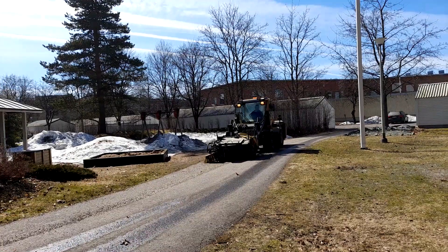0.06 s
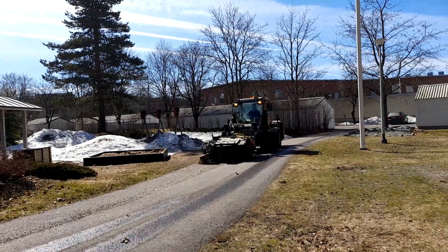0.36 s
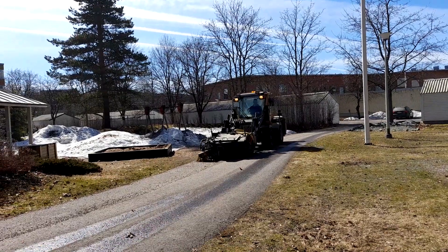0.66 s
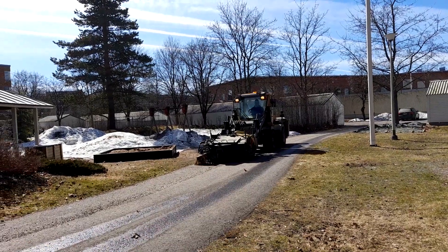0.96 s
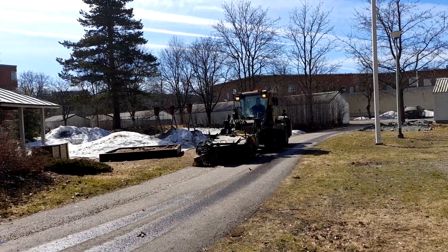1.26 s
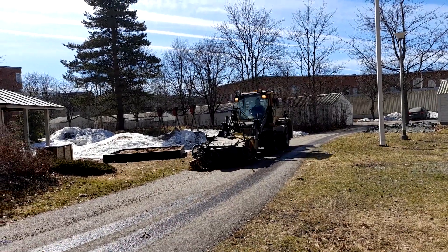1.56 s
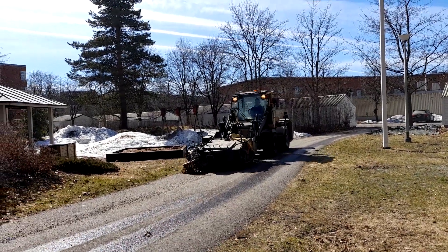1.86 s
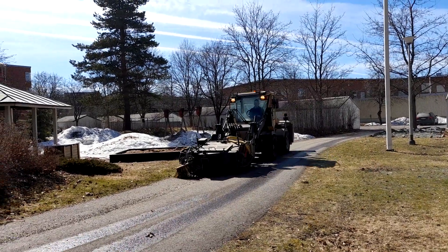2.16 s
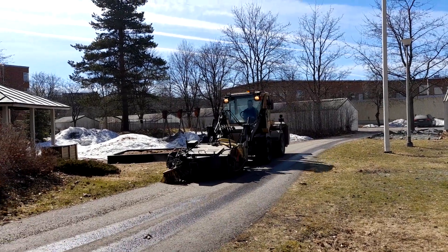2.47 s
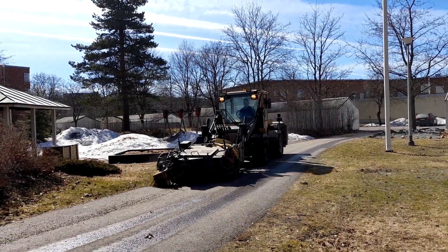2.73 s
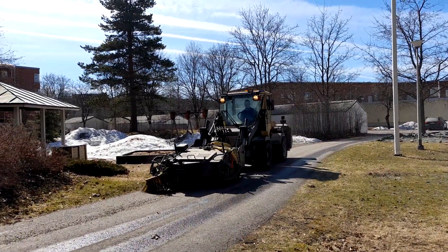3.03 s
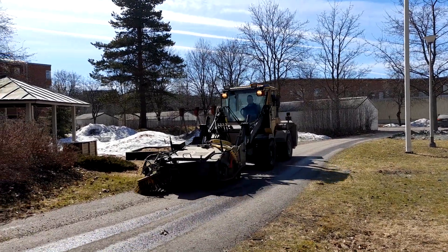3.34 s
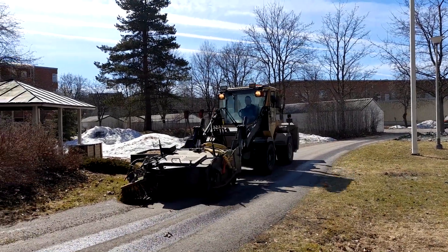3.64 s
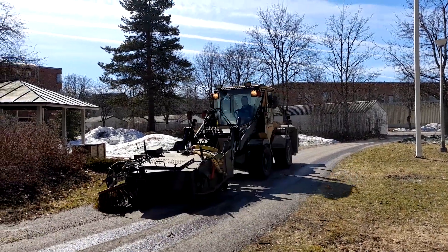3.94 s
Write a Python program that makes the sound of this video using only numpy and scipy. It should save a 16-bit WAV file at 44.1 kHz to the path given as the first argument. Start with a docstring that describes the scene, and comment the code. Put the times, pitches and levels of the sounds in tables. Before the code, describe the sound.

A sweeper's spinning brush flings rattling, hissing grit as its rumbling diesel loader approaches.

```python
"""A rotary broom sweeps a gritty path as the wheel loader carrying it creeps closer, in the open air.
The bristles fling grit in clumps that rattle on the hood and scratch over the path, and they hiss
more brightly as the machine nears. Bigger stones crack against the hood, which rumbles with countless
knocks, while the diesel drones at a steady speed. Early on, a gust of wind buffets the left microphone."""
import sys
import numpy as np
from scipy import signal
from scipy.fft import rfft, irfft, next_fast_len
from scipy.io import wavfile
from scipy.ndimage import map_coordinates

SR = 44100
rng = np.random.default_rng(int(sys.argv[2]) if len(sys.argv) > 2 else 0)


def persist_wave(psi):
    """Save psi, clipped to +-1, as 16-bit WAV."""
    counts = np.round(np.clip(psi, -1, 1) * 32767).astype(np.int16)
    wavfile.write(sys.argv[1], SR, np.atleast_2d(counts).T)


N = 176400   # 4 seconds


def broom():
    """Tufts of bristles fling grit in clumps; each clump rattles, scratches and hisses at once."""
    clumps = 1.96 * np.tanh(drift(hz=65) / 1.11) * (1 - 0.13 * nearness())
    load = clumps + 0.58 * drift(hz=11)   # how much grit is flying: quick clumps plus slower surges
    return rattle(load) + scratch(load) + hiss(clumps)


# how loud the grit rattles on the hood: t/s, level/dB
RATTLE_LEVEL = [(0, -32.5), (.18, -30), (.5, -32.5), (1.15, -28), (1.75, -29), (2.15, -29.5), (2.45, -27),
                (3.15, -27.5), (4, -24.5)]
# its tone colour (how strong each pitch is), far away and close by: f/Hz, level/dB
RATTLE_FAR = [(650, -41.5), (730, -21.5), (860, -5), (980, -12.5), (1100, 1), (1250, -9.5), (1630, -10),
              (2020, -17.5), (2150, -24.5)]
RATTLE_NEAR = [(650, -5.5), (760, -9.5), (880, 0), (1010, -3.5), (1220, 4.5), (1580, -4), (1850, 1),
               (2150, -15.5)]
def rattle(load):
    """Grit drums on the hood, harder inside a clump."""
    hits = impacts(per_s=900, spread_db=1.5, blur=0.62) * from_db(2 * load)
    hood = approaching(hits, RATTLE_FAR, RATTLE_NEAR)
    return from_db(in_time(RATTLE_LEVEL)[0] - 1.23) * place(hood, scatter=0.19)


# how loud the grit scratches over the path: t/s, level/dB
GRIT_LEVEL = [(0, -27), (.2, -25.5), (.34, -26.5), (.5, -28.5), (.85, -27.5), (.96, -25), (1.18, -25),
              (1.31, -27.5), (1.35, -21.5), (1.45, -29), (1.54, -22), (1.8, -24), (2.19, -25), (2.25, -29),
              (2.28, -24), (2.43, -25), (2.5, -20.5), (2.62, -22.5), (2.77, -22), (3.02, -23.5),
              (3.14, -29.5), (3.25, -21), (3.37, -21.5), (3.49, -22), (3.57, -21), (4, -19)]
# its tone colour, far away and close by: f/Hz, level/dB
GRIT_FAR = [(2050, -9.5), (2380, 0.5), (2890, -10.5), (3150, -3.5), (4500, -3), (5100, -9), (5790, -1.5),
            (6580, -1), (7300, -1.5), (8200, -8.5)]
GRIT_NEAR = [(2050, -7), (2450, 3.5), (2890, -4.5), (3810, 4.5), (4620, 0.5), (5130, -2), (5860, 3),
             (6650, 4), (7470, -0.5), (8200, -11)]
def scratch(load):
    """Grit skids over the path; single grains and pebbles stand out as pings and ticks."""
    hits = impacts(per_s=2200, spread_db=4, blur=0.98) * from_db(1.88 * load + drift(hz=82))
    grains = approaching(hits, GRIT_FAR, GRIT_NEAR) + from_db(-12) * pings(load)
    spray = place(grains, scatter=0.53) + from_db(-6.5) * place(ticks(load), scatter=0.99)
    return from_db(in_time(GRIT_LEVEL)[0] - 1.5) * spray


def pings(load, base_per_s=330):
    """Single grains ring briefly, each at one of 20 pitches, more often inside a clump."""
    struck = rng.random(N) < base_per_s / SR * from_db(3 * load)
    clicks = struck * rng.standard_normal((3, N)) * uneven_sizes(N, spread_db=1.9, cap=3)
    pitches_hz = np.geomspace(3016, 6480, 20)
    chosen = rng.integers(0, len(pitches_hz), N)
    return rms_one(sum(ring(clicks * (chosen == k), hz, width_hz=86) for k, hz in enumerate(pitches_hz)))


# tone colour of a pebble's sharp tick: f/Hz, level/dB
TICK_COLOUR = [(900, 3), (1300, -10), (2050, -8), (2500, -5.5), (4200, -5.5), (5900, 2.5), (7500, -4.5),
               (9000, -14), (12000, -10.5), (15500, -11)]
def ticks(load, base_per_s=70, scuff_s=0.0007):
    """Lone pebbles snap out of the clumps with a tiny scuff; close by they fade into the spray."""
    struck = rng.random(N) < base_per_s / SR * from_db(2.2 * load)
    hits = struck * uneven_sizes(N, spread_db=2.2, cap=2)
    contact = signal.lfilter([1], [1, -np.exp(-1 / (scuff_s * SR))], hits + 1e-18)   # each hit dies away
    scuffs = colour(contact * rng.standard_normal((3, N)), TICK_COLOUR)
    return rms_one(scuffs) * from_db(-5 * nearness())


# how loud the bristles and sand hiss: t/s, level/dB
HISS_LEVEL = [(0, -36.5), (.56, -33), (1.3, -35.5), (2.25, -32.5), (2.5, -33), (2.9, -30.5), (3.05, -35.5),
              (3.4, -31), (4, -28.5)]
# tone colour of the hiss, far away and close by: f/Hz, level/dB
HISS_FAR = [(7800, -10), (8300, -7), (9500, 1.5), (10900, 2.5), (12600, 4.5), (13900, -1), (15600, -7)]
HISS_NEAR = [(7400, -22), (7900, -16), (8500, 2.5), (9500, 1.5), (10900, 8), (12600, 3.5), (13900, 0),
             (15600, -10)]
def hiss(clumps):
    """Bristles and fine sand make so many tiny clicks that they blur into a hiss."""
    hits = impacts(per_s=16000, spread_db=3.2, blur=0.82) * from_db(1.4 * clumps)
    sand = approaching(hits, HISS_FAR, HISS_NEAR)
    return from_db(in_time(HISS_LEVEL)[0] - 1) * place(sand, scatter=4)


# stones hitting the hood: t/s, clank level/dB, crack level/dB, clatter fade time/s, stone's pitch f/Hz
STONE_HITS = [(0.165, -18, -22, 0.0058, 4150), (0.183, -21, -21, .005, 4500), (.277, -19, -19, 0.011, 4280),
              (.294, -26, -20, 0.007, 4500), (.362, -25, -32, .004, 4300), (0.385, -24, -23.5, .004, 5750),
              (.430, -21.5, -22, 0.015, 3740), (.567, -14, -19.5, 0.0035, 4400),
              (0.692, -14.5, -25.5, 0.01, 4160), (0.704, -40, -25.5, 0.0032, 4260),
              (.797, -22, -16.5, 0.0034, 4100), (.815, -31, -19.5, .006, 4100),
              (.860, -22, -31, 0.0031, 4500), (1.001, -33, -23, 0.0021, 3950),
              (1.164, -21.5, -25, 0.0096, 4500), (1.273, -27, -14, 0.0064, 4200),
              (1.285, -17.5, -23, 0.0049, 4600), (1.385, -16, -22.5, 0.0066, 4260),
              (1.609, -21, -21, 0.0034, 4260), (1.612, -11.5, -37, 0.007, 5650),
              (1.940, -24, -25, .006, 4452), (2.074, -21, -51, 0.0026, 4240),
              (2.102, -15.5, -28, 0.045, 4000), (2.153, -17, -22.5, 0.022, 4430),
              (2.269, -25, -23, 0.0016, 5740), (2.341, -24, -22.5, 0.0083, 4400),
              (2.358, -17.5, -19.5, 0.0088, 4260), (2.376, -21, -18, 0.027, 4500),
              (2.591, -17.5, -25, 0.021, 4200), (2.832, -27, -20, 0.0029, 5860),
              (2.953, -24, -21, 0.0057, 5670), (2.990, -24.5, -18, 0.0018, 3780),
              (3.079, -30, -17, 0.015, 4200), (3.098, -38, -16, 0.036, 4600),
              (3.164, -48, -18.5, .004, 4670), (3.429, -20, -18.5, 0.0033, 5450)]
# tone colours of the hood's clank and the stone's crack: f/Hz, level/dB
CLANK_COLOUR = [(500, -18), (700, -7), (880, 0.5), (1100, 8.5), (1260, 3.5), (1450, 0), (1750, -2),
                (2100, -38.5)]
CRACK_COLOUR = [(2000, -19.5), (2500, 2.5), (3300, -4.5), (4300, 2.5), (5100, -7), (5900, -1), (7500, -17),
                (9000, -5), (11500, -11), (15500, -37)]
def stones():
    """Each stone strikes and clatters on for a moment: the hood clanks, the stone cracks and rings."""
    clank, crack, tone = np.zeros((3, 3, N + SR))
    age = np.arange(SR // 10) / SR
    for start_s, clank_db, crack_db, fade_s, hz in STONE_HITS:
        clatter = rng.standard_normal((3, len(age))) ** 3 * np.exp(-age / fade_s)   # cubed noise is spiky
        clatter /= np.linalg.norm(clatter, axis=1, keepdims=True)
        clatter[:, 0] += 0.6   # the first strike
        clatter *= np.sqrt(0.0029 * SR)
        span = slice(int(start_s * SR), int(start_s * SR) + len(age))
        clank[:, span] += from_db(clank_db - 0.5) * clatter
        crack[:, span] += from_db(crack_db - 1) * clatter
        tone[:, span] += from_db(crack_db - 1) * ring(clatter, hz, width_hz=560)
    hood = place(colour(clank, CLANK_COLOUR), scatter=0.06)
    return hood + place(colour(crack, CRACK_COLOUR) + tone[:, :N], scatter=0.54)


# how loud the hood and body rumble: t/s, level/dB
RUMBLE_LEVEL = [(0, -23.5), (.17, -22.5), (.8, -23), (1.2, -23), (1.55, -23), (1.72, -21.5), (1.97, -17),
                (2.08, -21.5), (2.2, -18.5), (2.45, -21), (2.68, -18.5), (2.8, -19), (2.98, -17),
                (3.07, -21), (3.25, -17.5), (3.45, -21.5), (3.57, -18), (3.75, -20.5), (4, -19)]
# tone colour of the rumble, far away and close by: f/Hz, level/dB
RUMBLE_FAR = [(80, 2), (100, -5.5), (125, -5), (155, -8), (205, 2.5), (250, -8.5), (285, -3), (330, 1.5),
              (365, -9), (420, -8.5), (465, -14), (550, -14.5), (630, -27.5), (720, -25)]
RUMBLE_NEAR = [(80, 8), (100, -37.5), (125, -4.5), (155, -2.5), (180, 1), (210, 2), (250, -6.5), (285, 1),
               (330, 1), (365, -6), (420, -6.5), (465, -12.5), (550, -13.5), (630, -27.5), (720, -38)]
# the hood's two main booming notes: f/Hz, width/Hz, level/dB compared with the knocking
HOOD_NOTES = [(203.3, 12.2, -7.5), (333.7, 18.8, -14)]
def rumble(firings):
    """Dense knocks, throbbing with the engine, boom in the hood and body."""
    throb = 1 + 0.33 * np.cos(2 * np.pi * firings)
    knocks = impacts(per_s=500, spread_db=3.1, blur=0.43) * throb
    bass_cut = signal.butter(2, 78, "high", fs=SR, output="sos")
    body = rms_one(signal.sosfilt(bass_cut, approaching(knocks, RUMBLE_FAR, RUMBLE_NEAR)))
    for hz, width_hz, db in HOOD_NOTES:
        boom = ring(rng.standard_normal((3, N)), hz, width_hz)
        body += from_db(db) * rms_one(ring(boom, hz, 4 * width_hz))
    return from_db(in_time(RUMBLE_LEVEL)[0] + 0.56) * place(body, scatter=0.17)


# the running diesel: t/s, firing rate f/Hz, level/dB
DIESEL_RUN = [(0.0, 65.8, -23), (0.1, 63.37, -20), (0.67, 63.43, -24.5), (0.93, 65.4, -23.5),
              (2.57, 65.17, -23.5), (2.99, 65.34, -29), (3.37, 65.56, -20), (3.88, 65.4, -18),
              (3.9, 64.56, -17)]
# higher tones above its drone: multiple of the firing rate, level/dB
OVERTONES = [(1.5, -16), (2, -11.5), (3, -16.5), (4, -19.5), (4.5, -10.5), (5, -16), (6, -13.5)]
def diesel():
    """Cylinders fire so fast that they drone. Returns the sound and a running count of firings."""
    firing_hz, level_db = in_time(DIESEL_RUN)
    firings = np.cumsum(firing_hz) / SR
    drone = from_db(level_db - 1.5 - 0.4 * drift(hz=12)) * np.sin(2 * np.pi * firings)
    for multiple, db in OVERTONES:
        wavering = from_db(level_db.mean() + db + 1.5 * drift(hz=0.84))
        phase = 2 * np.pi * (multiple * firings + rng.random()) + 0.5 * drift(hz=11.4)
        drone += wavering * np.sin(phase)
    return np.sqrt(2) * drone, firings


# how the gust swells and dies down: t/s, level/dB
GUST_LEVEL = [(0, -50), (.08, -40), (.14, -24), (.22, -17), (.29, -19.5), (.36, -16.5), (.45, -19),
              (.52, -26), (.63, -22), (.68, -11), (.73, -10.5), (.79, -18), (.87, -18), (.92, -24.5),
              (.98, -15.5), (1.08, -22), (1.22, -25), (1.4, -37), (1.6, -70)]
# its tone colour: f/Hz, level/dB
GUST_COLOUR = [(20, -28), (45, -17), (85, 1.5), (130, -1.5), (200, -1.5), (300, -8.5), (450, -12.5),
               (620, -24.5), (900, -33)]
def wind():
    """Swirling air buffets the left microphone only."""
    swirl = rms_one(colour(rng.standard_normal((1, N)), GUST_COLOUR))
    left = swirl * from_db(in_time(GUST_LEVEL)[0] + 0.69 * drift(hz=23))
    return np.vstack([left, np.zeros((1, N))])


# tone colour of the outdoor background: f/Hz, level/dB
OUTDOOR_COLOUR = [(18, -11), (35, -21), (50, -16), (80, -4)]
def outdoors():
    """A faint, deep rumble lies under everything."""
    return from_db(-39.5) * place(colour(rng.standard_normal((3, N)), OUTDOOR_COLOUR), scatter=0.36)


# how much louder the left microphone is than the right: f/Hz, level/dB
LEFT_LOUDER = [(60, -3), (130, -0.5), (210, -0.5), (330, -3.5), (500, -1.5), (770, 2), (1170, -1),
               (1790, 2.5), (2740, -1.5), (3400, 0.5), (4190, -0.5), (5200, -13), (6410, 0.5), (9810, -1.5),
               (15000, -8.5)]
# how far the wave on the left runs ahead: f/Hz, phase/rad
LEFT_AHEAD = [(20, 0), (1700, 0.26), (3400, -0.27), (4400, 0.46), (5700, -0.07), (7400, 3), (16000, 4)]
def microphone_casing(x):
    """The casing shades and delays each pitch differently on the two sides."""
    size = next_fast_len(N + SR // 10)
    hz = np.arange(size // 2 + 1) * SR / size
    sides = np.array([[0.5], [-0.5]])   # half each, in opposite directions
    gain = from_db(sides * np.interp(hz, *np.transpose(LEFT_LOUDER)))
    delay = np.exp(1j * sides * np.interp(hz, *np.transpose(LEFT_AHEAD)))
    return irfft(rfft(x, size) * gain * delay, size)[:, :N]


def nearness(from_s=1.72, by_s=3.66):
    """0 while the machine is far, rising to 1 when it is close."""
    return np.clip((np.arange(N) / SR - from_s) / (by_s - from_s), 0, 1)


def approaching(clicks, far, near):
    """The tone colour slides from far to near as the machine comes closer."""
    share = nearness()
    return rms_one((1 - share) * colour(clicks, far) + share * colour(clicks, near))


def place(streams, scatter, far_lag_s=3e-6, near_lag_s=36e-6):
    """Three streams become stereo: a direct one, later on the right, and a scattered one for each side."""
    lag = SR * (far_lag_s + (near_lag_s - far_lag_s) * nearness())
    right = map_coordinates(streams[0], [np.arange(N) - lag], order=3)
    direct = np.array([streams[0], right])
    return (direct + scatter * streams[1:]) / np.sqrt(1 + scatter ** 2)


def impacts(per_s, spread_db, blur):
    """Three streams of random clicks; blur adds a bed of noise, like countless tiny ones."""
    sizes = uneven_sizes((3, N), spread_db, cap=4) * rng.choice([-1, 1], (3, N))
    clicks = sizes * (rng.random((3, N)) < per_s / SR)
    return rms_one(rms_one(clicks) + blur * rng.standard_normal((3, N)))


def uneven_sizes(shape, spread_db, cap):
    """Random strengths: many small, a few big."""
    return from_db(spread_db * np.minimum(rng.exponential(1, shape), cap))


def ring(x, hz, width_hz):
    """Make x ring at one pitch; a smaller width rings longer."""
    r = np.exp(-np.pi * width_hz / SR)
    feedback = [1, -2 * r * np.cos(2 * np.pi * hz / SR), r * r]
    return signal.lfilter(np.sqrt((1 - r * r) / 2) * np.array([1, 0, -1]), feedback, x + 1e-18)


def colour(x, points, fall_db_per_octave=70):
    """Give x a table's tone colour without making noise louder; pitches outside it drop steeply."""
    size = 8192
    octave = np.log2(np.maximum(np.arange(size // 2 + 1), 0.5) * SR / size)
    hz, db = np.transpose(points)
    beyond = np.abs(octave - np.clip(octave, np.log2(hz.min()), np.log2(hz.max())))
    shape_db = np.maximum(np.interp(octave, np.log2(hz), db) - fall_db_per_octave * beyond, -80)
    # fold the filter so that it rings only after a click, never before
    cepstrum = irfft(np.log(from_db(shape_db)))
    cepstrum[1:size // 2] *= 2
    cepstrum[size // 2 + 1:] = 0
    response = irfft(np.exp(rfft(cepstrum)))
    return signal.fftconvolve(x, response[None] / np.linalg.norm(response), axes=1)[:, :N]


def drift(hz):
    """A smooth random wobble of typical size 1; more hz makes it quicker."""
    step, warm_up = 40, 2000
    r = np.exp(-2 * np.pi * hz * step / SR)
    noise = rng.standard_normal(N // step + warm_up + 2)
    slow = signal.lfilter([1], [1, -2 * r, r * r], noise)[warm_up:]
    return np.interp(np.arange(N) / step, np.arange(len(slow)), rms_one(slow))


def in_time(rows):
    """Join a table's points in time with straight lines, one curve per column."""
    times, *columns = np.transpose(rows)
    return [np.interp(np.arange(N) / SR, times, column) for column in columns]


def from_db(db):
    """Turn decibels into a number to multiply by."""
    return 10 ** (np.asarray(db) / 20)


def rms_one(x):
    """Scale to an average power of 1."""
    return x / np.sqrt(np.mean(x ** 2) + 1e-20)


def scene():
    """Broom, stones, hood and diesel over a low outdoor rumble, and one gust of wind."""
    drone, firings = diesel()
    machine = broom() + stones() + rumble(firings) + drone
    return microphone_casing(machine + outdoors()) + wind()


def record(dry):
    """Peaks stop at full scale and the treble above 15800 Hz is cut."""
    treble_cut = signal.ellip(12, 0.1, 80, 15800, fs=SR, output="sos")
    return signal.sosfilt(treble_cut, np.clip(dry, -1, 1))


dry = scene()
out = record(dry)
persist_wave(out)
```